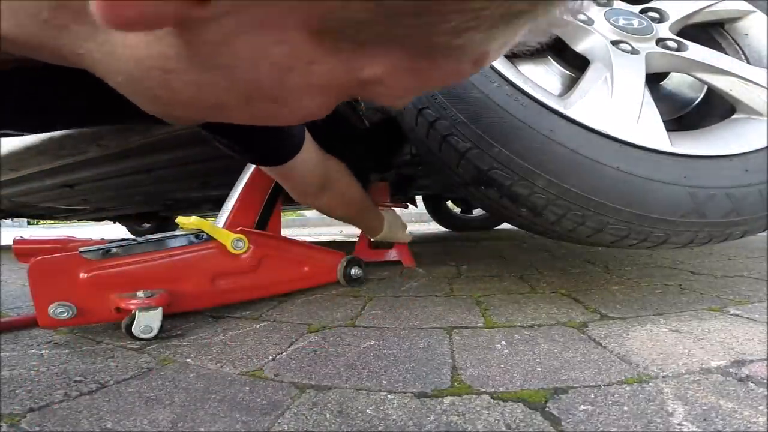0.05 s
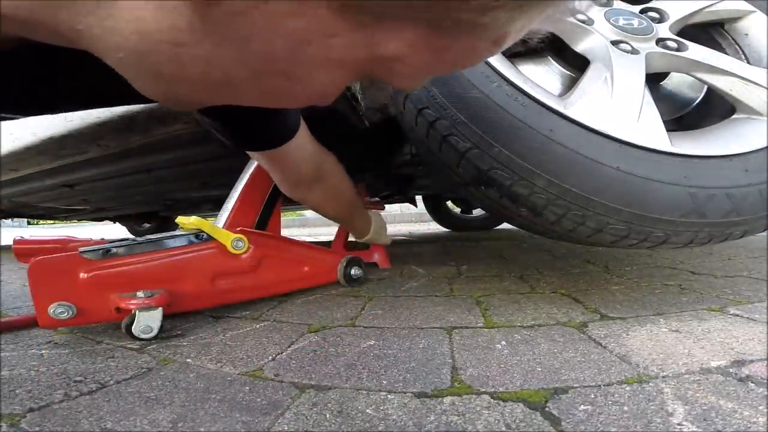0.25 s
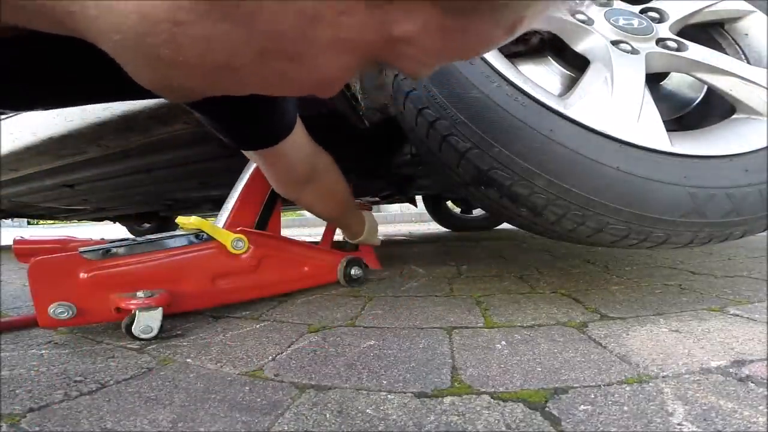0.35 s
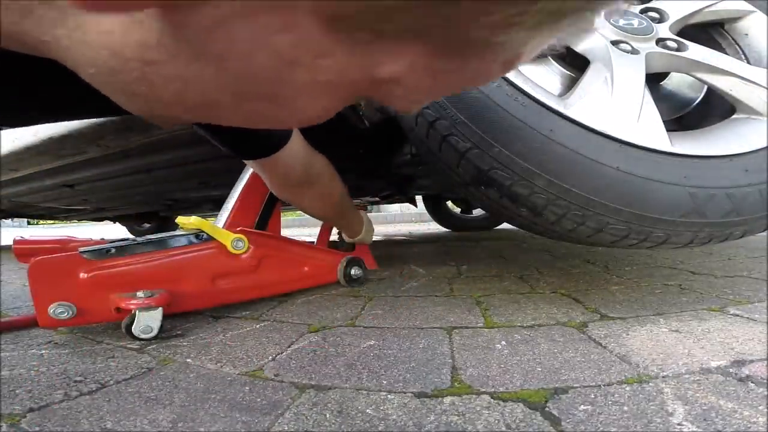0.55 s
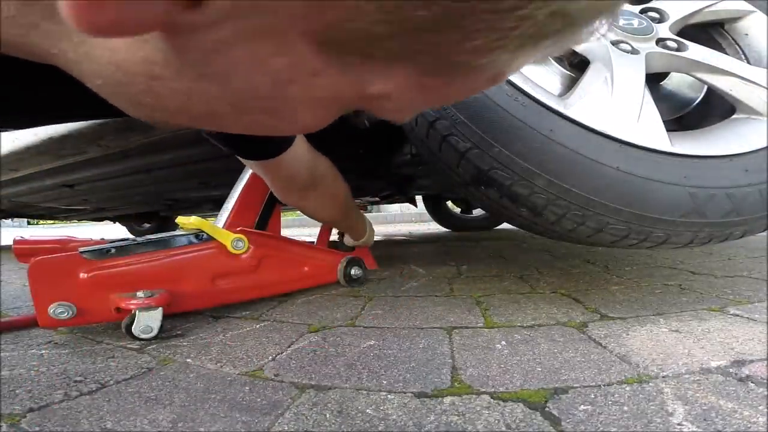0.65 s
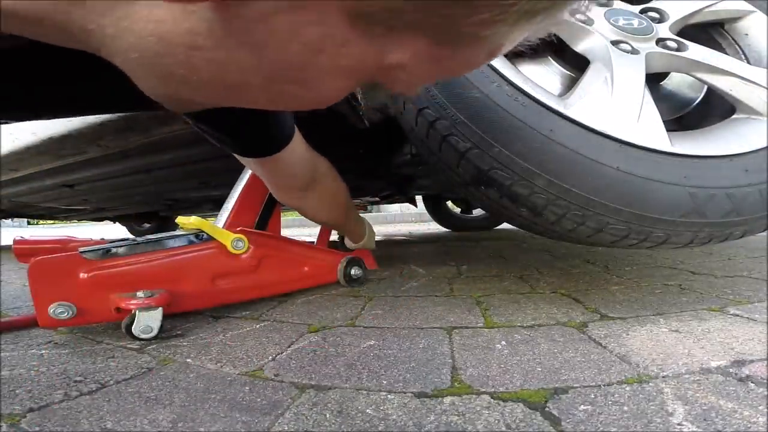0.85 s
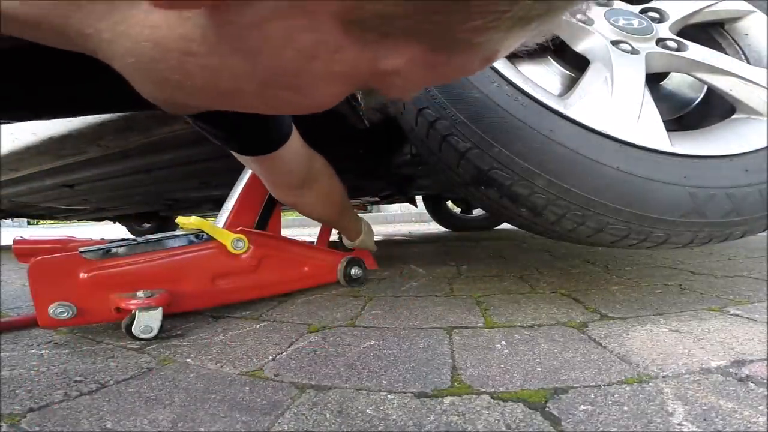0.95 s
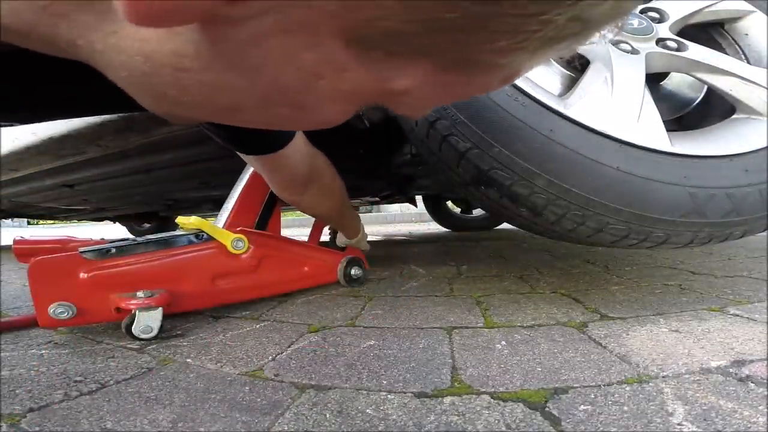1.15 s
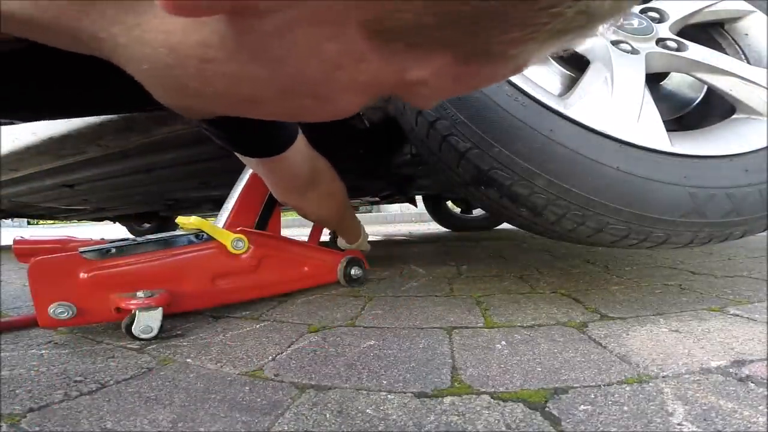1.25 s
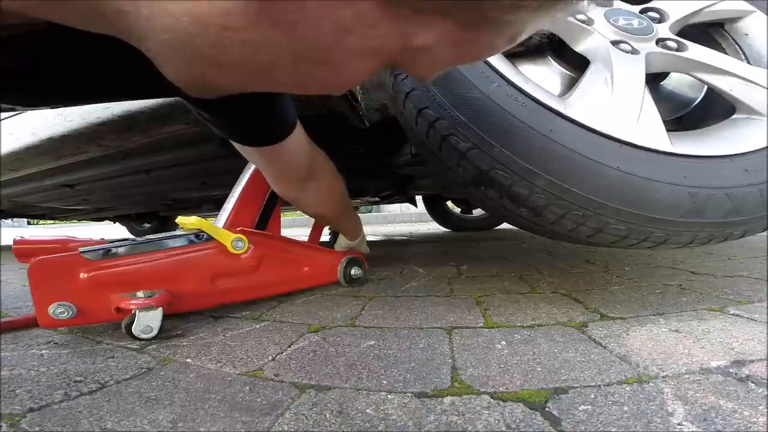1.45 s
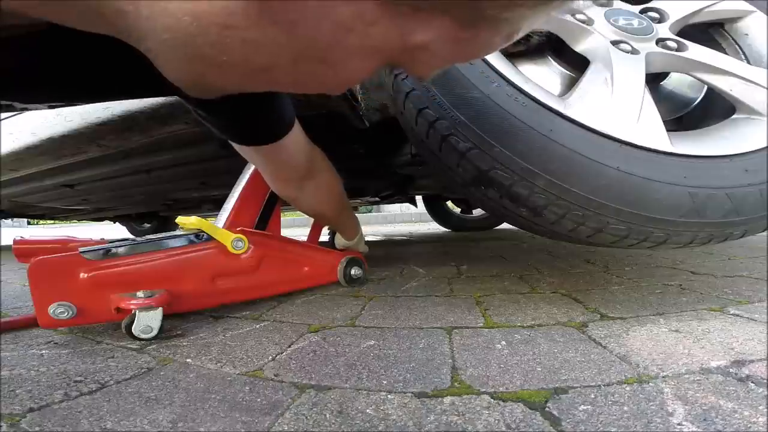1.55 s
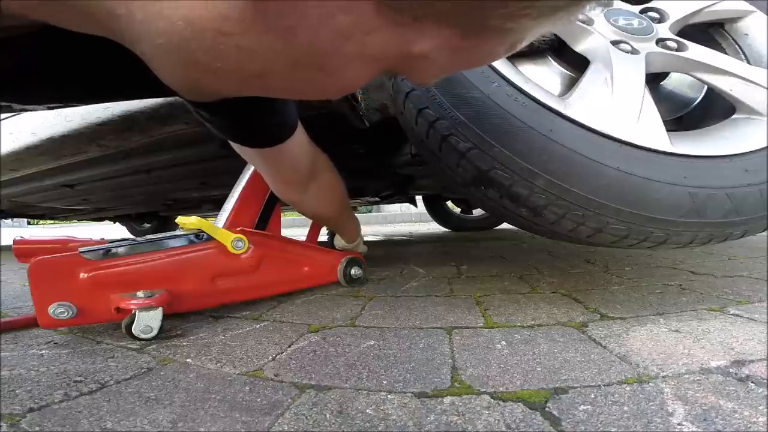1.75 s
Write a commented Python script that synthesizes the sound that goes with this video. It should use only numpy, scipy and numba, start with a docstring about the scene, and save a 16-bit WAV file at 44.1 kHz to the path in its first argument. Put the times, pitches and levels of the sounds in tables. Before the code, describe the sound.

A steel stand scrapes over stone paving close by. It knocks down, grinds loudly with brief metallic squeals and a low judder, then gets two shorter, lighter nudges. A tight echo and quiet outdoor background surround it.

```python
"""A steel axle stand is set down on block paving and shoved under a raised car in three pushes,
each shorter and lighter. Grit catches and breaks under its feet and rings the steel, and single
modes sing out briefly; the frame judders over the rough blocks. The gap between paving and car
floor adds a short echo, over a quiet outdoor background."""
import sys
import numpy as np
from scipy import signal
from scipy.fft import rfft, irfft
from scipy.io import wavfile
from scipy.ndimage import uniform_filter1d
from numba import njit

SR = 44100
rng = np.random.default_rng(int(sys.argv[2]) if len(sys.argv) > 2 else 0)


def pcm_store(signal):
    """Save signal as 16-bit PCM."""
    levels = np.round(np.clip(np.atleast_2d(signal), -1, 1) * 32767)
    wavfile.write(sys.argv[1], SR, levels.astype(np.int16).T)


N = 79380
GRIT_PER_S = 2000


def undb(db):
    """Decibels to gain."""
    return 10 ** (np.asarray(db) / 20)


def unit(x):
    """Scale to rms 1."""
    return x / np.sqrt(np.mean(x ** 2))


def norm(x):
    """Scale to energy 1."""
    return x / np.sqrt(np.sum(x ** 2))


def ring(x, response):
    """Play x through an impulse response."""
    return signal.fftconvolve(x, response)[:N]


def fade(t60_s):
    """Exponential decay, 60 dB down after t60_s."""
    return np.exp(-np.log(1000) * np.arange(SR // 2) / SR / t60_s)


def colour(x, points, size=8192):
    """Minimum-phase EQ through (freq_hz, gain_db) points."""
    hz, db = np.array(points, float).T
    bins_hz = np.arange(size // 2 + 1) * SR / size
    gain = undb(np.interp(np.log(bins_hz + 1), np.log(hz), db))
    cepstrum = irfft(np.log(gain))
    cepstrum[1:size // 2] *= 2
    cepstrum[size // 2 + 1:] = 0
    return signal.fftconvolve(x, irfft(np.exp(rfft(cepstrum))))[:len(x)]


@njit
def resonate(x, hz, width_hz):
    """Band-pass whose centre may move."""
    y, band, low = np.empty(len(x)), 0., 0.
    for i in range(len(x)):
        g, damping = np.tan(np.pi * hz[i] / SR), width_hz / hz[i]
        v = (band + g * (x[i] - low)) / (1 + g * (g + damping))
        band, low = 2 * v - band, low + 2 * g * v
        y[i] = damping * v
    return y


def walk(rate_hz):
    """Smooth random modulation with spread near 1."""
    knots = rng.standard_normal(N // 20)
    return np.interp(np.arange(N) / SR * rate_hz, np.arange(len(knots)), knots)


def modes(table):
    """Damped sines from rows of (pitch_hz, level_db, t60_s)."""
    t = np.arange(SR // 2) / SR
    return norm(sum(rng.choice([-1, 1]) * undb(db) * norm(np.sin(2 * np.pi * hz * t) * fade(t60_s))
                    for hz, db, t60_s in table))


def tail(t60_s):
    """Decaying noise: countless weak modes dying away together."""
    return norm(rng.standard_normal(SR // 2) * fade(t60_s))


def grains(per_s, spread_db):
    """Random clicks of scattered size, rms 1."""
    clicks = (rng.random(N) < per_s / SR) * rng.choice([-1, 1], N)
    return unit(clicks * undb(spread_db * np.clip(rng.standard_normal(N), -2, 2)))


def hit(start_s, db, response, window_s=.012):
    """Place a one-shot with the energy of window_s of sound at db."""
    placed = np.concatenate([np.zeros(int(start_s * SR)), norm(response), np.zeros(N)])[:N]
    return placed * undb(db) * np.sqrt(window_s * SR)


# Dark tone of the outdoor bed: freq_hz, gain_db
OUTDOOR_EQ = [(25, -2.5), (80, -3.5), (134, -7), (607, -8.5), (714, -14.5), (988, -12.5), (1560, -23),
              (6000, -36), (15000, -52)]

def outdoors(level_db=-47, waver_db=.7):
    """A low, slightly wavering wash of distant sound."""
    wash = colour(rng.standard_normal(N), OUTDOOR_EQ)
    return undb(level_db) * unit(wash * undb(waver_db * walk(24)))


def car_echo(x, t60_s=.22):
    """Short, mid-heavy reflections between paving and car floor."""
    return ring(x, colour(tail(t60_s), [(200, -11), (2000, 2), (10000, -4.5)]))


# Light ticks: start_s, level_db
TICK_HITS = [(0.0099, -40), (0.106, -53), (1.087, -46.5), (1.139, -42), (1.188, -42.5), (1.67, -49)]
# Their thin, bright tone: freq_hz, gain_db
TICK_EQ = [(300, -21), (5000, -9.5), (6500, 1.5), (8000, -11.5), (16000, -17)]

def ticks(t60_s=.049):
    """Loose metal and sharp grit tick in tiny bursts of noise."""
    return sum(hit(start_s, db, colour(tail(t60_s), TICK_EQ)) for start_s, db in TICK_HITS)


# The base meets the paving: start_s, level_db
KNOCK_HITS = [(0.1191, -26.5), (.1247, -27.5), (.565, -32.5)]
# Ring of the base: pitch_hz, level_db, t60_s
BASE_RING = [(970, 6, 0.095), (1436, 5.5, .062), (1992, 4.5, 0.0315), (4120, -4.5, 0.053)]

def knocks(stone_db=-8, stone_t60_s=.0428, cutoff_hz=4500):
    """The base lands dully on stone before the first push and settles after it."""
    lowpass = signal.butter(3, cutoff_hz, fs=SR, output="sos")
    out = 0
    for start_s, db in KNOCK_HITS:
        base = modes(BASE_RING)
        stone = norm(colour(tail(stone_t60_s), [(100, -7.5), (250, -.5), (2200, -7), (7000, -19)]))
        out += hit(start_s, db, signal.sosfilt(lowpass, base + undb(stone_db) * stone))
    return out


def joint_bump(start_s=.5105, level_db=-24.5, pitch_hz=193, t60_s=.021):
    """One low thud as the stand drops into a paving joint."""
    thud = colour(modes([(pitch_hz, 0, t60_s)]), [(50, -19), (140, -2)])
    return hit(start_s, level_db, thud)


# Bassy tone of the frame's rumble: freq_hz, gain_db
RUMBLE_EQ = [(40, -33), (75, -14), (125, 0.5), (310, 2.5), (500, -8.5), (850, -9), (1500, -12.5),
             (4000, -54)]
# The thrum rises with the force of the push: rasp_db, pitch_hz
THRUM_PITCH = [(-43.5, 144), (-34, 239)]

def judder(jolts_per_s=370, rumble_db=2.5, thrum_db=-1, width_hz=41):
    """The frame jolts over the rough blocks and thrums higher when pushed harder."""
    force, shake = push_envelopes()
    body = tail(t60_s=.15)
    body[0] += undb(3)  # the dry jolt ahead of the ring
    rumble = unit(colour(ring(grains(jolts_per_s, spread_db=2.5), body), RUMBLE_EQ))
    hz = np.interp(20 * np.log10(force + 1e-9), *np.array(THRUM_PITCH, float).T)
    jolts = grains(jolts_per_s, spread_db=2)
    thrum = unit(resonate(resonate(jolts, hz, width_hz), hz, width_hz))
    return shake * (undb(rumble_db) * rumble + undb(thrum_db) * thrum)


# A foot's edge grates on one mode of the steel: start_s, release_s, pitch_hz, level_db
SING_NOTES = [(0.21, 0.234, 962, -24.5), (0.192, 0.312, 2592, -29), (0.215, 0.317, 2785, -27),
              (.263, 0.388, 3667, -27.5), (0.322, .375, 2295, -24), (0.34, 0.38, 1955, -27),
              (0.347, 0.382, 2985, -21), (0.356, 0.416, 1720, -28), (0.427, 0.537, 976, -36),
              (1.12, 1.192, 3880, -38), (1.206, 1.218, 833, -30.5), (1.628, 1.628, 2595, -42)]

def sings(attack_s=.012, t60_s=.08, rough_db=3, rough_hz=171.6, wander=.00714):
    """Stick and slip lock onto one mode: a rough, wandering tone that rings on as the foot moves off."""
    t, out = np.arange(N) / SR, 0
    for start_s, release_s, hz, db in SING_NOTES:
        attack = np.clip((t - start_s) / attack_s, 0, 1)
        release = np.exp(-np.log(1000) * np.maximum(t - release_s, 0) / t60_s)
        pitch_hz = hz * (1 + wander * walk(rough_hz))
        tone = np.sin(2 * np.pi * np.cumsum(pitch_hz) / SR)
        out += undb(db) * attack * release * unit(tone * undb(rough_db * walk(rough_hz)))
    return out


# Ring of the upright: pitch_hz, level_db
UPRIGHT_RING = [(825, 2.5), (966, 1.5), (1367, 4), (1500, -1), (2590, 2), (2792, -5), (3120, -6.5),
                (3480, -0.5), (4220, -4.5), (5030, -15), (7948, -9)]

def upright(t60_s=.13):
    """The pitched clang of the stand's upright."""
    return modes([(hz, db, t60_s) for hz, db in UPRIGHT_RING])


def steel_ring(count=60, overtone_db=3, spread_db=8.5):
    """The steel's dense ring, topped by high modes scattered in pitch and strength."""
    t = np.arange(SR // 2) / SR
    dense = tail(t60_s=.055)
    hz = np.linspace(3800, 15300, count) + 200 * rng.random(count)
    gains = undb(spread_db * np.clip(rng.standard_normal(count), -2, 1)) * rng.choice([-1, 1], count)
    overtones = norm(gains @ np.sin(2 * np.pi * hz[:, None] * t) * fade(t60_s=.045))
    return dense + undb(overtone_db) * overtones


# Tone of grit on steel: freq_hz, gain_db
CONTACT_EQ = [(100, -26.5), (300, -2.5), (650, 2), (1350, 6), (1700, -1), (2150, 2), (2900, 4.5),
              (3750, -0.5), (4300, -18.5), (5000, -6.5), (5400, -18), (6500, -15.5), (7200, -24.5),
              (9500, -26.5), (15500, -42.5)]

def contact(steel, crack_db=-7.5, crack_t60_s=.0019):
    """One grain breaks: a sharp crack with the ring of the steel behind it."""
    return norm(colour(undb(crack_db) * tail(crack_t60_s) + steel, CONTACT_EQ))


def brighten(x, db, full_push_db=-15, boost_per_db=.35, shelf_hz=6460):
    """Light contacts crush finer grit and carry more treble."""
    treble = signal.sosfiltfilt(signal.butter(1, shelf_hz, "high", fs=SR, output="sos"), x)
    boost_db = boost_per_db * np.clip(full_push_db - db, 0, 35)
    return x + treble * (undb(boost_db) - 1)


# Accents in the scrape: start_s, strength_db, centre_hz, slip_t60_s
SNAG_HITS = [(0.2281, -20.5, 2900, 0.011), (0.2666, -12.5, 3340, 0.027), (.326, -18.5, 5130, .012),
             (0.3422, -12.5, 2100, .006), (.353, -16, 2700, 0.0057), (.373, -11.5, 2470, .02),
             (.4075, -15, 4860, .008), (0.4841, -26, 4000, 0.012), (.5114, -20.5, 1130, .009),
             (1.0863, -28, 2960, 0.0098), (1.1825, -27.5, 1460, .025), (1.6346, -32, 3000, 0.017)]

def snags(trim_db=-5, upright_db=-7):
    """A foot catches and springs free: a brief slip that stresses one band of the stand's ring."""
    out = 0
    for start_s, db, hz, slip_t60_s in SNAG_HITS:
        clang = contact(steel_ring()) + undb(upright_db) * upright()
        slip = grains(GRIT_PER_S, spread_db=1)[:SR // 2] * fade(slip_t60_s)
        slip[0] = np.sqrt(SR / GRIT_PER_S)  # always open on a click
        catch = colour(ring(clang, slip), [(hz / 2, -9), (hz, 0), (hz * 2, -5)])
        out += hit(start_s, db + trim_db, brighten(catch, db))
    return out


# Fader moves, one list per push: time_s, rasp_db, judder_db
PUSH_FADERS = [
    [(.135, -43, -43.5), (.168, -31.5, -47.5), (.205, -23.5, -35.5), (.3, -18.5, -33.5), (.37, -17, -31.5),
     (.452, -20.5, -29), (.505, -26, -33), (.545, -42, -36), (.615, -82.5, -51.5)],
    [(1.06, -58, -46), (1.086, -42.5, -38), (1.115, -28.5, -36.5), (1.15, -27.5, -32), (1.19, -32.5, -36.5),
     (1.222, -33, -36), (1.24, -46, -41.5), (1.295, -57.5, -46.5), (1.35, -75, -61)],
    [(1.6, -65, -58.5), (1.632, -50, -45.5), (1.668, -42.5, -47), (1.704, -44.5, -39.5), (1.73, -57, -51),
     (1.765, -86, -74)],
]

def push_envelopes():
    """The pushes as two smooth gain curves: force for the rasp, shake for the judder."""
    t, curves = np.arange(N) / SR, []
    for column in (1, 2):
        gain = sum(undb(np.interp(t, push[:, 0], push[:, column], left=-np.inf, right=-np.inf))
                   for push in map(np.array, PUSH_FADERS))
        curves.append(np.abs(uniform_filter1d(gain, size=400)))
    return curves


def scrape(feet=3, rasp_db=-2.5, upright_db=-10.5, chatter_db=3.5, rock_db=2.5):
    """Grit breaks in spurts under each foot as the weight rocks between them, ringing the steel."""
    steel = steel_ring()
    force, _ = push_envelopes()
    force_db = 20 * np.log10(force + 1e-9)
    push = force * unit(undb(chatter_db * walk(rate_hz=120.5)))
    out = 0
    for _ in range(feet):
        grit = grains(GRIT_PER_S / feet, spread_db=1)
        weight = undb(rock_db * walk(rate_hz=60.2))
        crunch = brighten(push * unit(grit * weight), force_db)
        out += ring(crunch, undb(rasp_db) * contact(steel) + undb(upright_db) * upright())
    return out / np.sqrt(feet)


def scene(echo_db=-9.5):
    """The stand, its echo under the car and the outdoor bed, in mono."""
    stand = scrape() + sings() + snags() + judder() + joint_bump() + knocks() + ticks()
    return (stand + undb(echo_db) * car_echo(stand) + outdoors())[None]


def record(dry):
    """Soft clipping rounds the highest peaks; a steep low-pass cuts the top."""
    ceiling, top_hz = .9, 15450
    lowpass = signal.ellip(10, .2, 80, top_hz, fs=SR, output="sos")
    return signal.sosfilt(lowpass, ceiling * np.tanh(dry / ceiling))


dry = scene()
out = record(dry)
pcm_store(out)
```